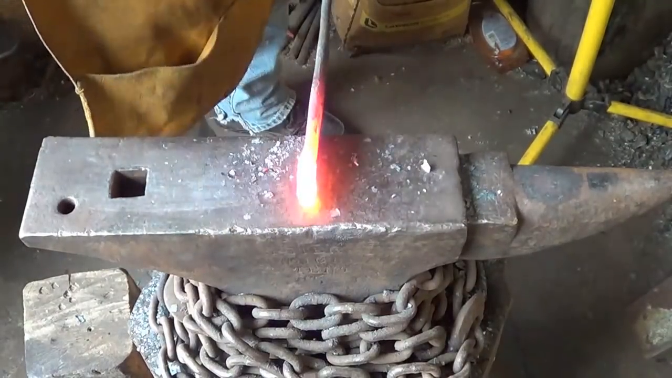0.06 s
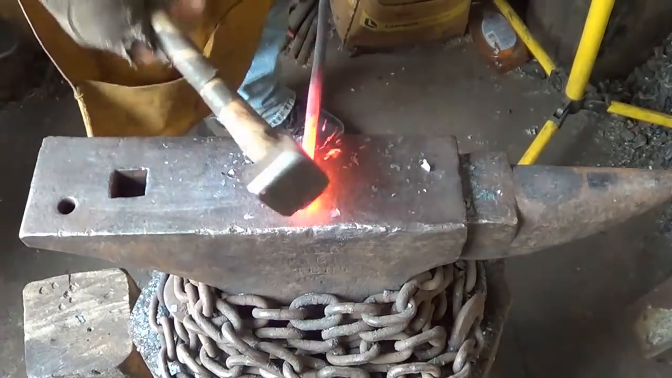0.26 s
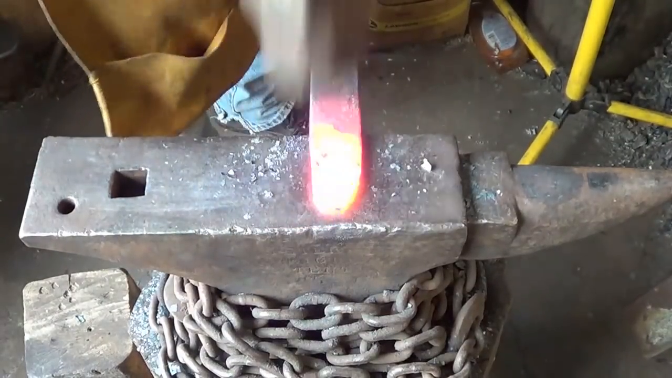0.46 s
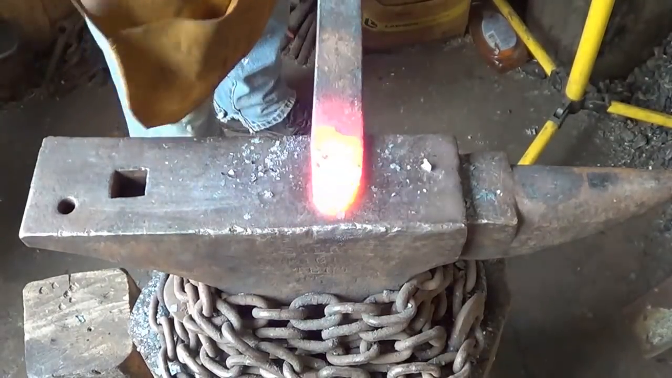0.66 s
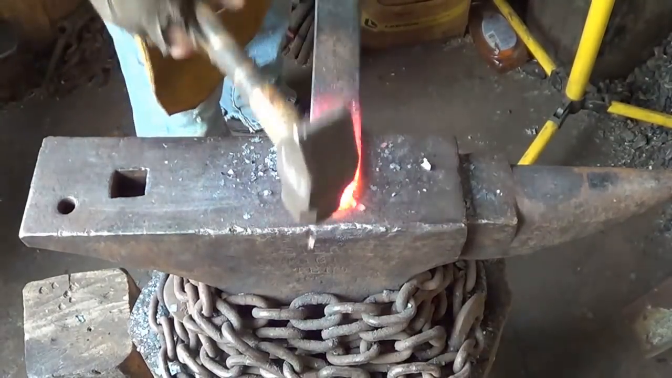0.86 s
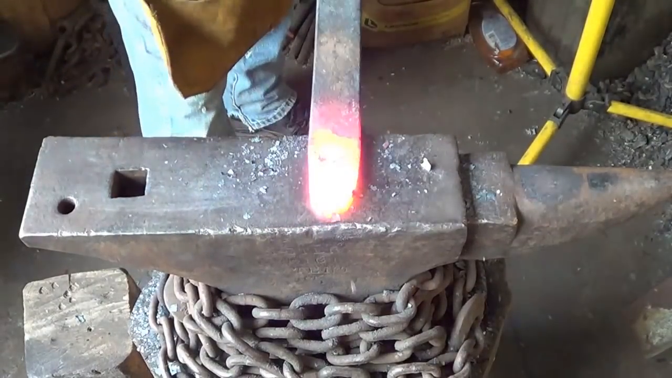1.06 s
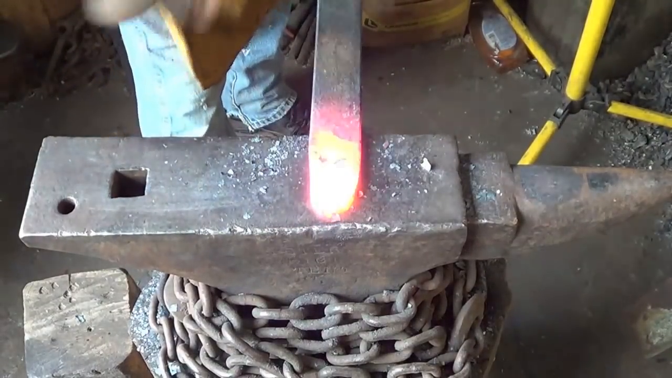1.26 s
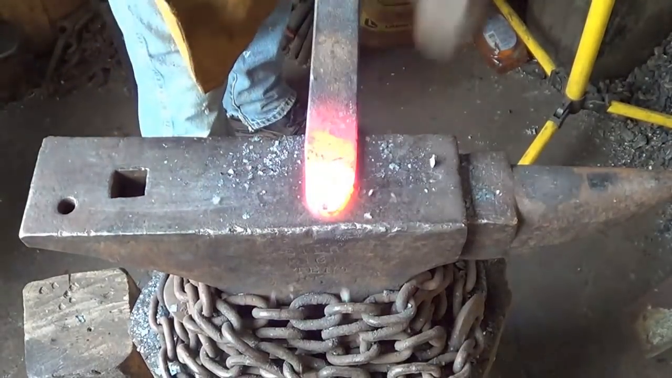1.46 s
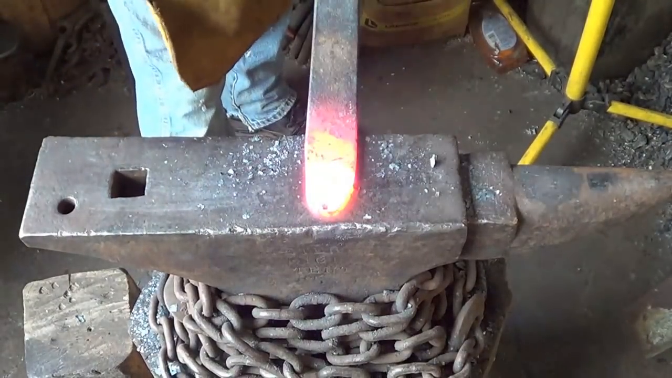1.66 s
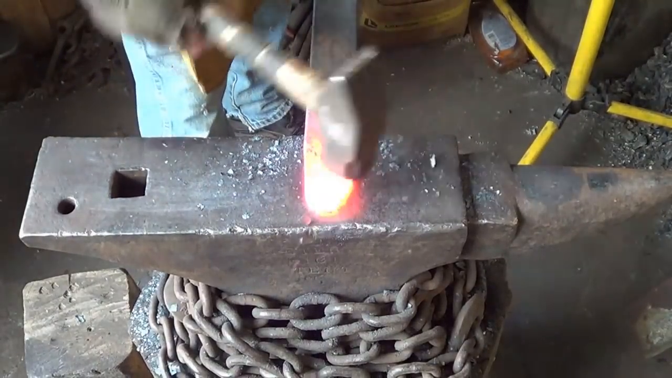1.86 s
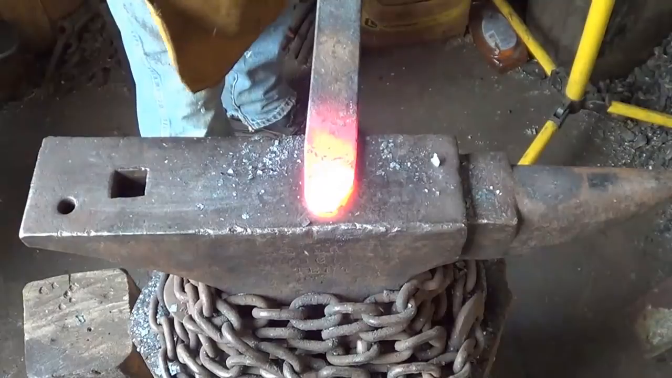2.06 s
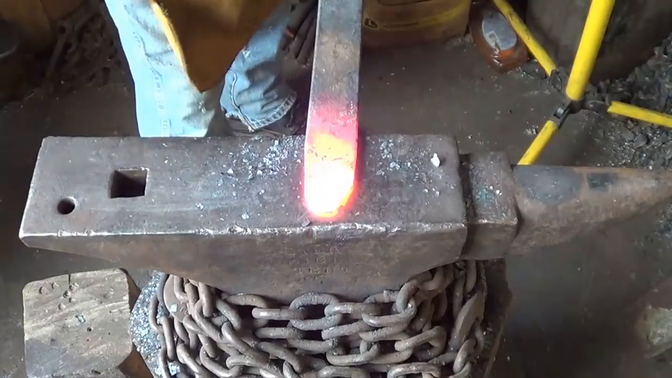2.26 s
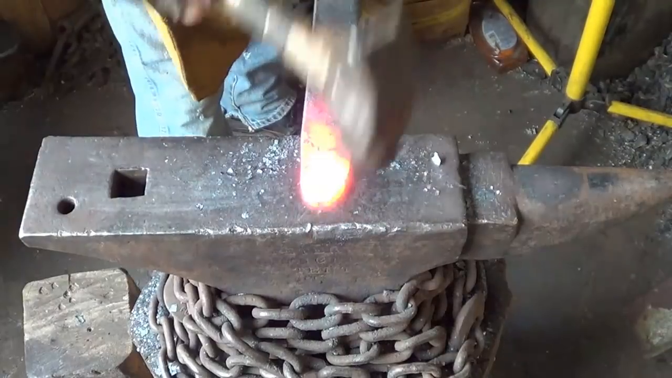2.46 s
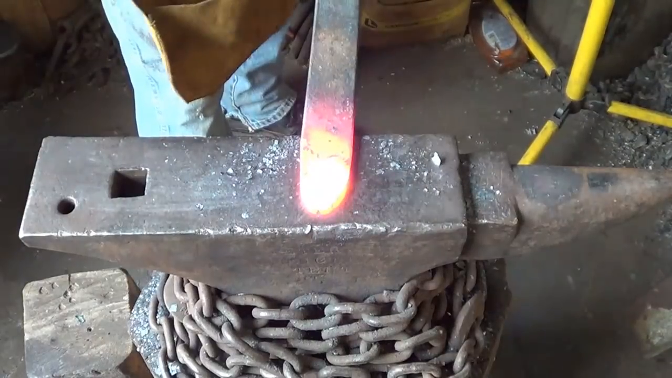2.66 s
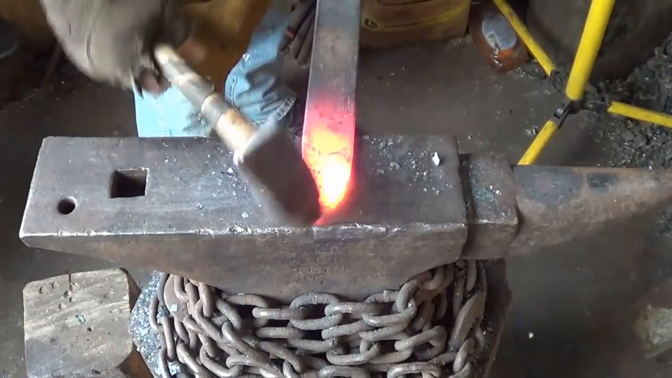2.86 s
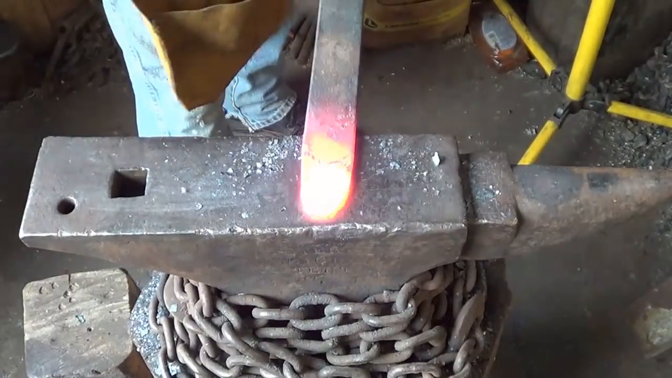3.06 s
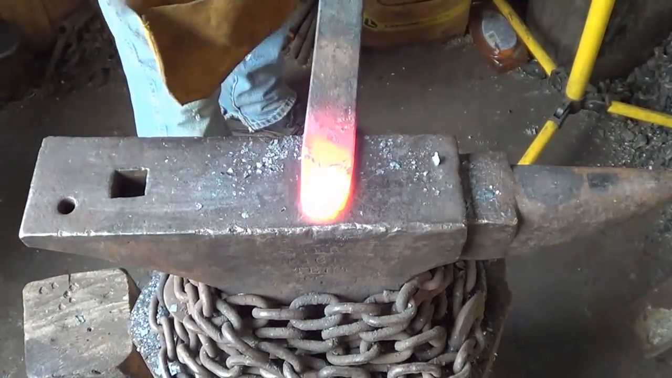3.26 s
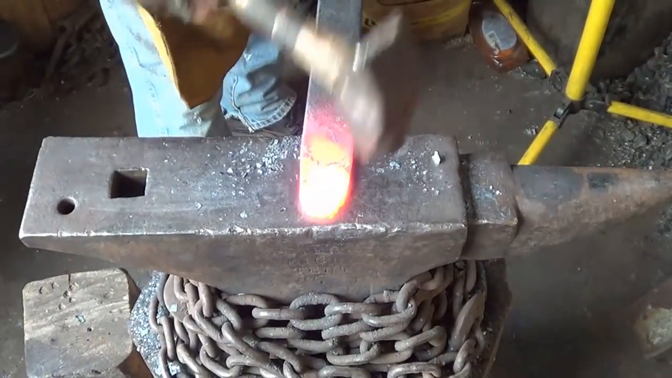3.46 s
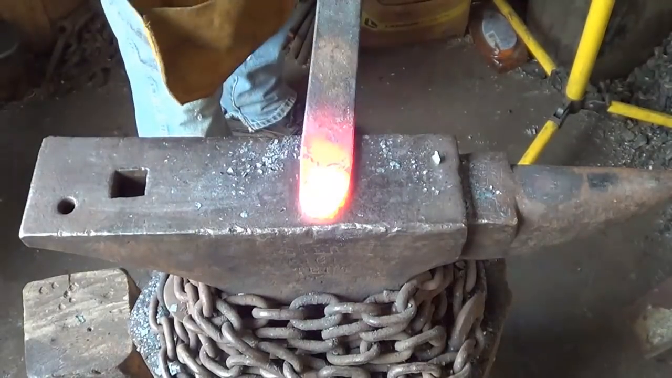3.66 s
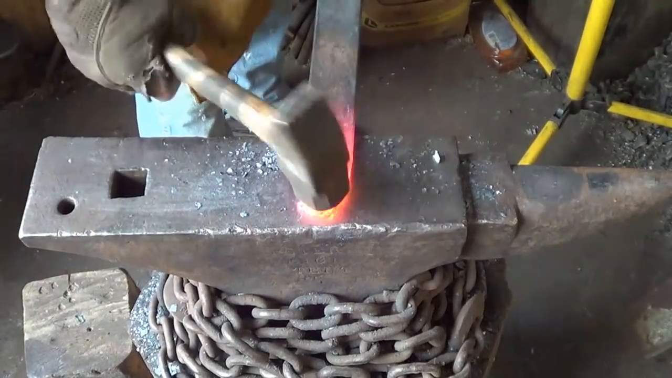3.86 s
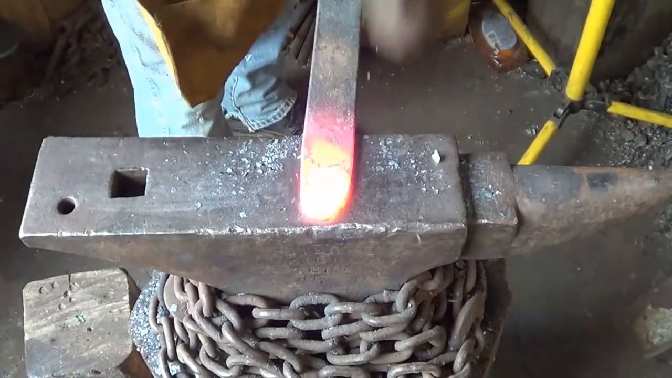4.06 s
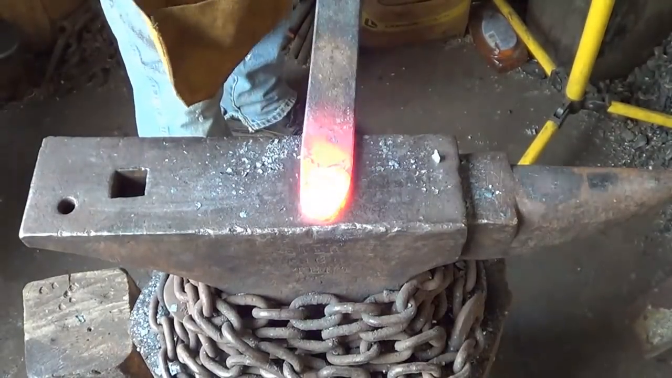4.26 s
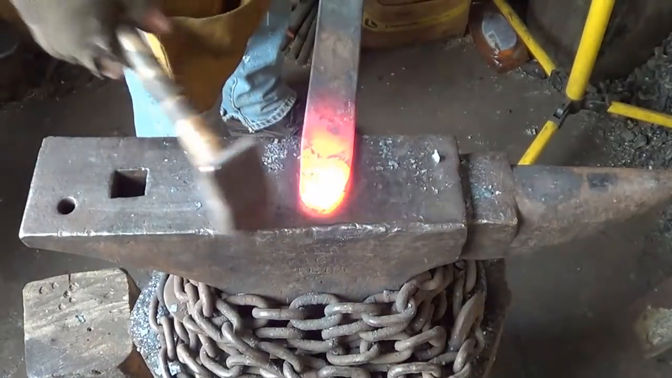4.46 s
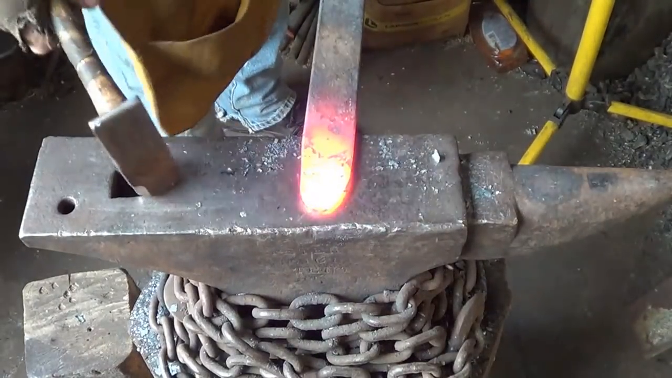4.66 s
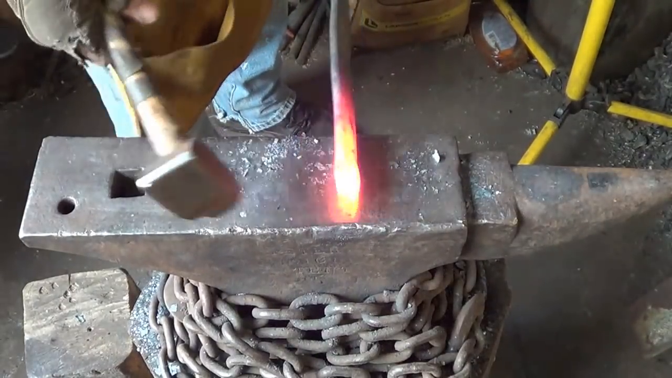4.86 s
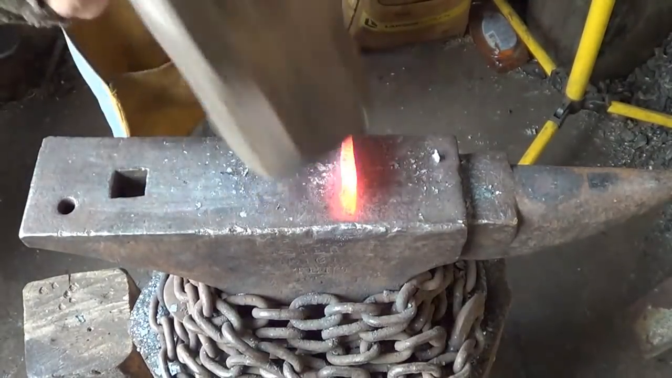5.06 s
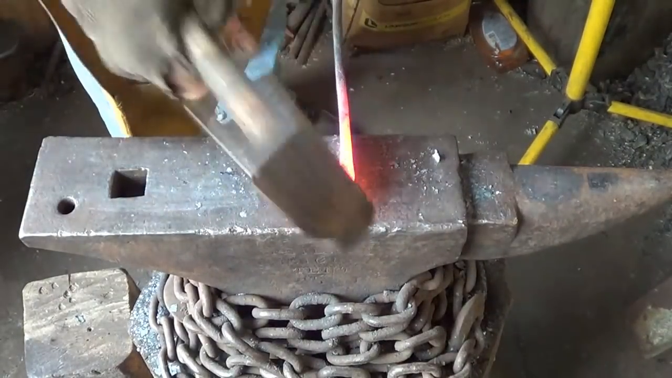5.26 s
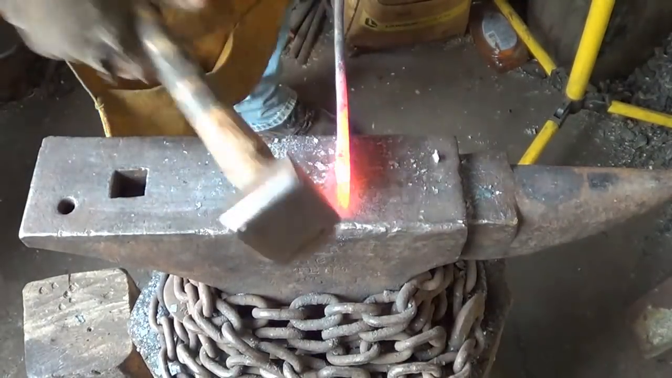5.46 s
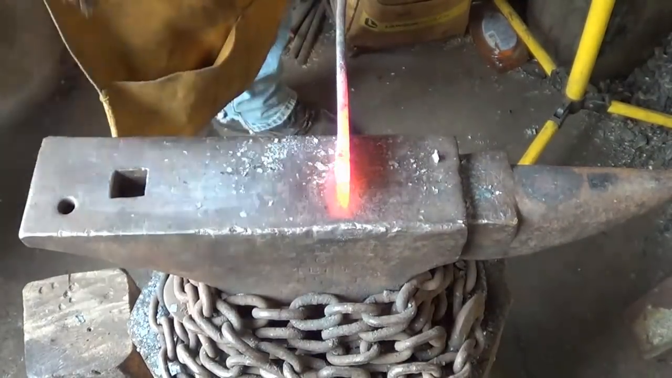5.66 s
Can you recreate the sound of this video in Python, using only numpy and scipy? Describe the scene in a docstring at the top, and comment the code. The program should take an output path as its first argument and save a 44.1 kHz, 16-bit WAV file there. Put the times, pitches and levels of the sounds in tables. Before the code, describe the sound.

Hammer blows on steel, recorded close and loud with flattened peaks: each a noisy crack and short anvil ring, then a thin high tone swelling as the hammer lifts. Early bar clatter precedes a regular run; rapid hammer taps and a duller final blow end it. A steady low burner rush with faint fan hum fills the small, briefly echoing room.

```python
"""Smith at the anvil

A smith flattens a glowing bar, about two blows a second, close to a microphone in a small workshop.
Each blow is a noisy crack, a sum of fading anvil tones, and a hammer head that sings on and swells as it is lifted.
Noise grains make the bar clatter, the hammer once bounces to rest on the bare face, and the bar squeaks faintly.
Behind it a forge rushes as filtered noise with fan tones; a limiter flattens the blows."""
import sys
import numpy as np
from scipy import signal
from scipy.fft import rfft, irfft
from scipy.io import wavfile
from scipy.ndimage import uniform_filter1d, minimum_filter1d

SR = 44100
rng = np.random.default_rng(int(sys.argv[2]) if len(sys.argv) > 2 else 0)


def store_pcm(level_fs):
    """Save levels as 16-bit WAV."""
    pcm = np.round(np.clip(level_fs, -1, 1) * 32767).astype(np.int16)
    wavfile.write(sys.argv[1], SR, np.atleast_2d(pcm).T)


N = 251811

# time in seconds within one short sound, and the frequencies of its spectrum
T = np.arange(32400) / SR
HZ = np.fft.rfftfreq(len(T), 1 / SR)


def amp(db):
    """Turns decibels into a gain."""
    return 10 ** (np.asarray(db) / 20)


def unit(x):
    """Scales a signal to an rms of one."""
    return x / np.sqrt(np.mean(x ** 2))


def read(points, hz):
    """Reads a table at any frequency, with straight lines on a log-frequency axis."""
    f, value = np.transpose(points)
    return np.interp(np.log(hz + 1), np.log(f + 1), value)


def fade(t60, t=T):
    """Exponential decay that falls by 60 dB in t60 seconds."""
    return np.exp(-np.log(1000) * t / t60)


def tilt(slope_db, hz):
    """A harder contact lifts the treble against the bass, in dB per octave around 3000 Hz."""
    return amp(slope_db * np.log2(np.maximum(hz, 400) / 3000))


def noise(gain, size):
    """Noise of rms one with the given spectrum."""
    return unit(irfft(rfft(rng.standard_normal(size)) * gain, size))


def add(mix, s, sound):
    """Mixes a stereo sound in at time s, cutting off what lies outside the scene."""
    start = round(s * SR)
    sound = sound[:, max(-start, 0):]
    part = mix[:, max(start, 0):][:, :sound.shape[1]]
    part += sound[:, :part.shape[1]]


# How wide the stereo image is. Each row: frequency in Hz, side against mid level in dB.
STEREO_WIDTH = [(60, -20), (300, -14.5), (2000, -8.5), (4500, -3), (8000, -4.5), (13000, -1.5)]


def spread(mid, side):
    """Left and right from two unrelated signals; the bass stays near mono."""
    width = amp(read(STEREO_WIDTH, np.fft.rfftfreq(len(side), 1 / SR)))
    side = irfft(rfft(side) * width, len(side))
    return np.array([mid + side, mid - side])


# How fast the workshop's echoes die. Each row: frequency in Hz, time to fall by 60 dB in seconds.
ROOM_DECAY = [(100, 0.61), (400, 0.2873), (1500, 0.448), (4000, 0.36), (8000, 0.29), (15000, 0.22)]


def workshop(build_s=0.0029):
    """Room response: dense reflections that build up quickly, each band dying at its own speed."""
    hz, t, bands = signal.stft(rng.standard_normal((2, len(T))), SR, nperseg=256)
    decay = fade(read(ROOM_DECAY, hz)[:, None], t)
    tails = signal.istft(bands * decay, SR, nperseg=256)[1][:, :len(T)]
    tails = tails * (1 - np.exp(-T / build_s))
    return spread(*tails) / np.linalg.norm(tails[0])


def in_room(sound, room, wet_db):
    """Direct sound plus its reverberation."""
    echoes = signal.fftconvolve(np.atleast_2d(sound), room, axes=1)[:, :len(T)]
    return sound + amp(wet_db) * echoes


def ring(hz, t60, gain, shimmer=.6, shimmer_per_s=60, side_db=-7):
    """Decaying modes; reflections make each one waver, differently at the two microphone ports."""
    out = np.zeros((2, len(T)))
    knots = np.arange(64) / shimmer_per_s
    for f, decay, g in zip(hz, t60, gain):
        a, b, c, d = rng.standard_normal((4, len(knots))) / np.sqrt(2)
        envelope = fade(decay)
        # complex wavering changes both the level and the phase
        mid = envelope * (1 + shimmer * np.interp(T, knots, a + 1j * b))
        side = envelope * np.interp(T, knots, c + 1j * d)
        side = side * amp(side_db) * min(f / 4000, 1)  # low modes are narrower
        # wavering leaves the energy of the mid signal as it was
        wave = g * np.exp(2j * np.pi * f * T) * np.linalg.norm(envelope) / np.linalg.norm(mid)
        out += (np.array([mid + side, mid - side]) * wave).imag
    soft_start = 1 - np.exp(-(T / .0004) ** 2)
    return out * soft_start


# Colour of the forge's rush. Each row: frequency in Hz, relative level per Hz in dB.
FORGE_COLOUR = [(15, -59.5), (25, -17.5), (108, -2), (175, -2), (373, 3), (439, -3), (503, -3), (863, -1),
                (1480, -13), (1740, -13.5), (2280, -15), (2480, -19), (7310, -27.5), (10700, -28.5),
                (16000, -52)]
# Hum of the fan. Each row: frequency in Hz, level in dB around which it wavers.
FAN_TONES = [(124, -61.5), (345, -72), (675, -58), (890, -60)]


def forge(rush_db=-43.5, flicker_db=0.75, flicker_hz=12, waver=0.5, waver_hz=4):
    """Flickering rush of the burner, made of filtered noise, with a few wavering fan tones."""
    hz, t = np.fft.rfftfreq(N, 1 / SR), np.arange(N) / SR
    colour = amp(read(FORGE_COLOUR, hz))
    flicker = amp(flicker_db * noise(np.exp(-hz / flicker_hz), N))
    rush = spread(noise(colour, N), noise(colour, N)) * flicker
    fan = np.zeros(N)
    for f, db in FAN_TONES:
        swaying = 1 + waver * noise(np.exp(-hz / waver_hz), N)
        fan += amp(db) * np.sin(2 * np.pi * f * t) * swaying
    return amp(rush_db) * rush + fan


# A faint squeak as the bar is tipped on edge.
# Each row: time in seconds, pitch in Hz, level in dB before the room is added.
SQUEAK_PATH = [(4.882, 3420, -64), (4.919, 4100, -54), (4.959, 4200, -74.5), (5.008, 4350, -83)]


def squeak(room, width_hz=120):
    """A rising friction tone, made fuzzy by multiplying it with slow noise."""
    s, hz, db = np.transpose(SQUEAK_PATH)
    now = T + s[0]
    carrier = np.sin(2 * np.pi * np.cumsum(np.interp(now, s, hz)) / SR)
    level = np.interp(now, s, amp(db), right=0)
    fuzz = noise(np.exp(-(HZ / width_hz) ** 2), len(T))
    return in_room(level * carrier * fuzz, room, wet_db=6.5)


# Toneless part of the bar's chink. Each row: frequency in Hz, relative level per Hz in dB.
CHINK_COLOUR = [(100, -26), (1000, -11.5), (2000, -5), (3200, 6.5), (5200, 3.5), (8000, 0.5), (12000, -6.5),
                (16000, -34)]
# The bar's own modes when it knocks.
# Each row: frequency in Hz, time to fall by 60 dB in seconds, relative level in dB.
BAR_MODES = [(2850, 0.054, -18), (3350, 0.17, -28.5), (3900, 0.12, -19.5), (4840, 0.048, -30),
             (4900, 0.099, -17.5), (5800, 0.11, -15)]


def clatter(room, db, t60, chatter_db=1.5, chatter_hz=220):
    """The bar chatters on the face: uneven bright grains and a brief ring of its own."""
    hz, mode_t60, mode_db = np.transpose(BAR_MODES)
    grains = unit(amp(chatter_db * noise(np.exp(-HZ / chatter_hz), len(T))))
    chink = grains * noise(amp(read(CHINK_COLOUR, HZ)), len(T)) * fade(t60)
    return amp(db) * in_room(chink + ring(hz, mode_t60, amp(mode_db)), room, wet_db=-10.5)


# The knock of the contact itself. Each row: frequency in Hz, relative level per Hz in dB.
KNOCK_COLOUR = [(40, -24), (200, -6.5), (600, -6), (1200, -2.5), (2000, -2.5), (3000, -7.5), (5000, -23),
                (16000, -40.5)]


def knock(t60):
    """The short, hollow clack of the contact: a fading noise burst through a filter."""
    burst = unit(rng.standard_normal(len(T))) * fade(t60)
    all_hz = abs(np.fft.fftfreq(len(T), 1 / SR))
    log_gain = np.log(unit(amp(read(KNOCK_COLOUR, all_hz))))
    # minimum phase: the filter responds as early as it can, so the clack stays crisp
    response = np.exp(signal.hilbert(log_gain).conj())
    clack = np.fft.ifft(np.fft.fft(burst) * response).real
    return clack * np.linalg.norm(fade(t60)) / np.linalg.norm(clack)


# What a bounce rings. Each row: frequency in Hz, time to fall by 60 dB in seconds,
# relative level in dB before the brightness of the bounce.
BOUNCE_RING = [(166, 0.3, -38), (1606, 0.031, -8), (1740, .065, -11), (2120, 0.033, -6.5),
               (2610, 0.069, -24), (2950, 0.073, -21), (4580, .04, -24), (9970, 0.064, -32.5),
               (4720, 0.23, -36), (6445, .13, -35)]


def bounce(room, db, slope_db, knock_db=-6, knock_t60=0.019):
    """The loosely held hammer clacks on the cold face: a short knock and quickly fading modes."""
    hz, t60, mode_db = np.transpose(BOUNCE_RING)
    clack = ring(hz, t60, amp(mode_db) * tilt(slope_db, hz)) + amp(knock_db) * knock(knock_t60)
    return amp(db) * in_room(clack, room, wet_db=-12.5)


# Dense, fast ringing of bar, scale and chain.
# Each row: frequency in Hz, relative level per Hz in dB before the hardness of the blow.
CRACK_COLOUR = [(45, -39.5), (80, -19.5), (200, -4.5), (450, -1), (900, -11), (1500, -6), (3000, 4),
                (5000, 1.5), (8000, 0.5), (11000, 0), (14500, -17), (16500, -26)]
# The anvil settling on its stand. Each row: frequency in Hz, relative level per Hz in dB.
SETTLE_COLOUR = [(45, -53), (65, -17.5), (82, 3.5), (105, -9), (200, -2.5), (350, 3), (700, -1),
                 (2000, -14.5), (16000, -63)]


def impact(room, crack_db, slope_db, level_db=2.5, t60=0.15, knock_db=8, knock_t60=0.015,
           settle_db=-21, settle_s=0.0662, settle_width_s=0.012):
    """A knock, a crash of dense short modes, and a dull thud as the anvil settles."""
    crash_colour = amp(read(CRACK_COLOUR, HZ)) * tilt(slope_db, HZ)
    crash = amp(level_db) * noise(crash_colour, len(T)) * fade(t60)
    thud_swell = np.exp(-((T - settle_s) / settle_width_s) ** 2)
    thud = amp(settle_db) * noise(amp(read(SETTLE_COLOUR, HZ)), len(T)) * thud_swell
    thud = thud * tilt(slope_db, 0)  # a harder contact thuds less
    low = amp(knock_db) * knock(knock_t60) + thud
    return amp(crack_db) * in_room(crash + low, room, wet_db=-3.5)


# The anvil with the bar on it. Each row: frequency in Hz, time to fall by 60 dB in seconds before
# the sustain factor, then relative level in dB when struck left, in the middle and right.
ANVIL_MODES = [(1690, .3, -20, -19, -22), (1795, .3, -21, -19, -17), (2109, .46, -8, -4.5, -11),
               (2416, .42, -19, -18, -19), (2698, .55, -18, -16, -22), (2844, .42, -11, -13, -14),
               (2934, .5, -12, -9, -11), (3326, .42, -14, -12, -14), (3757, .52, -11, -12, -10),
               (3935, .45, -24, -21, -23), (4245, .42, -19, -18, -14), (4601, .4, -1, -11, -22),
               (4718, .52, -24, -14, -17), (4975, .42, -6, -14, -9), (5333, .44, -19, -17, -14),
               (5875, .4, -16, -17, -13), (6318, .42, -30, -16, -18), (6440, .46, -19, -14, -16),
               (6720, .35, -22, -26, -16), (7135, .4, -19, -20, -16), (7292, .38, -22, -14, -21),
               (7820, .33, -20, -23, -19), (8485, .33, -15, -19, -19), (9082, .38, -27, -23, -24),
               (9915, .36, -23, -19, -20), (10352, .3, -19, -19, -20), (12610, .32, -21, -28, -30)]
# Names of the three spots, in the order of those level columns.
SPOT_NAMES = ["left", "middle", "right"]
ANVIL_SHARE = .5  # share of the contact's hardness that reaches the anvil's modes (0-1)
ANVIL_TILT_DB = -1.6  # a blow wakes the high modes less than the low ones (dB per octave)


def anvil(spot, ring_db, slope_db, level_db=2.2, sustain=0.8, scatter_db=1.2, shimmer=.9):
    """The spot that is struck decides how strongly a blow wakes each mode."""
    hz, t60, *spot_db = np.transpose(ANVIL_MODES)
    db = spot_db[SPOT_NAMES.index(spot)] + scatter_db * rng.standard_normal(len(hz))
    brightness = tilt(ANVIL_SHARE * slope_db + ANVIL_TILT_DB, hz)
    return ring(hz, t60 * sustain, amp(level_db + ring_db + db) * brightness, shimmer)


# Modes of the hammer head. Each row: frequency in Hz, time to fall by 60 dB in seconds
# before the sustain factor, relative level in dB.
HEAD_MODES = [(11012, .85, -17), (7135, .85, -35), (14930, .75, -43)]


def hammer(room, ring_db, pass_s, width_s, swell_db, level_db=1, sustain=0.99,
           doppler=0.002404, away_db=-4):
    """The head rings on while it is lifted: louder near the microphone, sharp coming and flat going."""
    u = (T - pass_s) / width_s
    near = 1 / (1 + u ** 4)
    away = (1 - near) * (u > 0)
    # a clock that runs fast before the pass and slow after it bends the pitch
    clock = T + np.cumsum(-doppler * 2 * u / (1 + u ** 2)) / SR
    tone = 0
    for hz, t60, db in HEAD_MODES:
        # reflections of the moving head beat against the direct tone
        flutter = .2 * noise(np.exp(-(HZ / 45) ** 2), len(T))
        beat = 1 + flutter + .17 * noise(np.exp(-(HZ / 260) ** 2), len(T))
        tone = tone + amp(db) * fade(t60 * sustain) * beat * np.sin(2 * np.pi * hz * clock)
    level = amp(level_db + ring_db + swell_db * near + away_db * away)
    return in_room(level * tone, room, wet_db=-8)


# A bar on edge cushions the blow, so the head sings less:
# relative level of the head in dB, and its rise in dB per step of hardness
HEAD_DB, HEAD_DB_PER_HARDNESS = -0.5, 4.5
PASS_S = 0.044  # every lift is equally quick: half the time the head spends near the microphone


def blow(room, spot, force_db, hardness, pass_s, swell_db):
    """Force sets the level of crack, anvil and head; a harder contact is brighter and wakes the head more."""
    head_db = HEAD_DB + force_db + HEAD_DB_PER_HARDNESS * hardness
    crack = impact(room, force_db, hardness)
    anvil_ring = anvil(spot, force_db, hardness)
    return crack + anvil_ring + hammer(room, head_db, pass_s, PASS_S, swell_db)


# The bar knocking and sliding on the face.
# Each row: start in seconds, relative level in dB, time for the grains to fall by 60 dB in seconds.
BAR_CLATTERS = [(0.151, -49, 0.08), (0.445, -37, 0.29), (0.4648, -13.5, 0.11), (.502, -6, 0.13),
                (.521, -16, 0.13), (.539, -12, 0.069), (1.262, -36.5, 0.14), (1.304, -30, 0.5),
                (3.361, -34, 0.31), (5.244, -45, 0.018), (5.308, -39.5, 0.19)]
# The hammer bouncing on the bare face.
# Each row: start in seconds, relative level in dB, brightness in dB per octave.
HAMMER_BOUNCES = [(4.5333, -5.5, -3), (4.6012, -0.5, 6), (4.6527, 0, 4.5), (4.699, -4, 2.5),
                  (4.7349, -1, -4), (4.7592, -8, -1.5)]
# Hammer blows. Each row: start in seconds, spot on the face, force in dB, hardness of the contact
# in dB per octave, seconds until the lifted hammer passes the microphone, swell of that pass in dB.
HAMMER_BLOWS = [(-.255, "middle", -5, 1, 0.22, 15.5), (0.234, "left", -3.5, -2.2, 0.2, 2.5),
                (0.8047, "right", -3.5, 1.66, .2, 15), (1.3302, "middle", -2.5, -0.5, 0.2, 11.5),
                (1.8474, "middle", -2, -0.62, 0.22, 13.5), (2.3671, "middle", -0.5, 0.46, 0.21, 13.5),
                (2.8636, "middle", -2, 0.82, 0.23, 12.5), (3.3795, "middle", -0.5, 0.04, .22, 17),
                (3.887, "middle", 0, -0.4, .24, 12), (4.394, "right", 0, .5, 0.11, 3),
                (5.3281, "right", -6, -2.5, .27, 21.5)]


def scene():
    """All sources in one workshop, slightly to the right."""
    room, mix = workshop(), forge()
    add(mix, SQUEAK_PATH[0][0], squeak(room))
    for s, db, t60 in BAR_CLATTERS:
        add(mix, s, clatter(room, db, t60))
    for s, db, slope_db in HAMMER_BOUNCES:
        add(mix, s, bounce(room, db, slope_db))
    for s, *stroke in HAMMER_BLOWS:
        add(mix, s, blow(room, *stroke))
    return mix * amp([[-.4], [.4]])


def record(dry, ceiling_db=-7.0, release_db_per_s=260, squeeze=0.84, edge_hz=16100):
    """A fast peak limiter takes away most of what rises above the ceiling; then a low-pass filter."""
    over_db = np.maximum(20 * np.log10(abs(dry).max(0) + 1e-9) - ceiling_db, 0)
    # hold each peak, then let go at a steady speed
    fall = np.arange(N) * release_db_per_s / SR
    held_db = np.maximum.accumulate(over_db + fall) - fall
    # act a few samples early, and smoothly
    gain_db = uniform_filter1d(minimum_filter1d(-held_db, size=32), size=32)
    limited = dry * amp(squeeze * gain_db)
    low_pass = signal.firwin(255, edge_hz, window=("kaiser", 9), fs=SR)
    return signal.oaconvolve(limited, low_pass[None], "same")


dry = scene()
out = record(dry)
store_pcm(out)
```